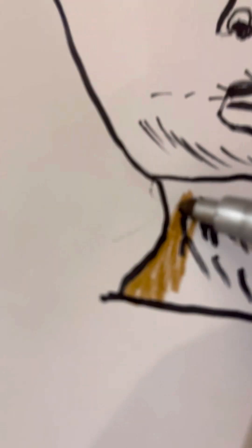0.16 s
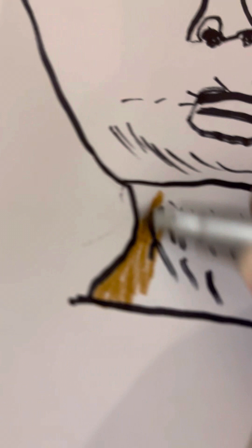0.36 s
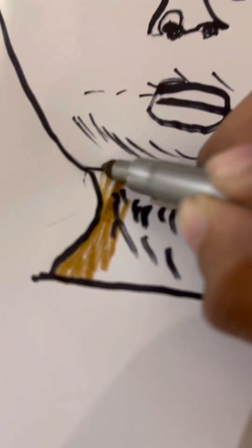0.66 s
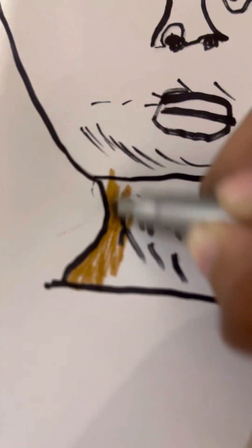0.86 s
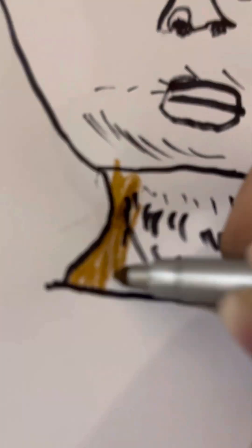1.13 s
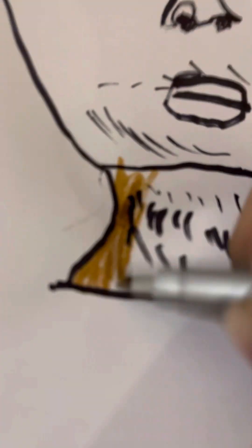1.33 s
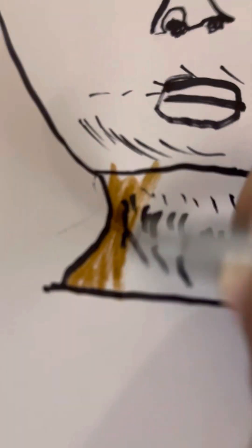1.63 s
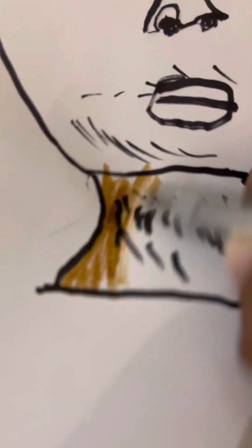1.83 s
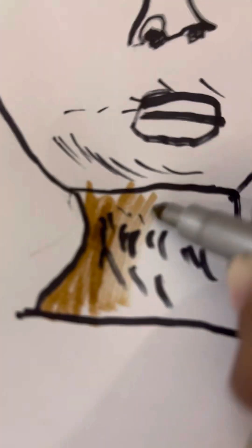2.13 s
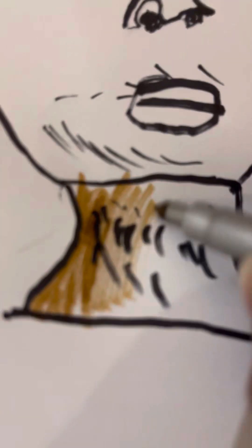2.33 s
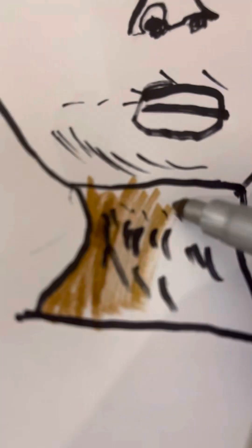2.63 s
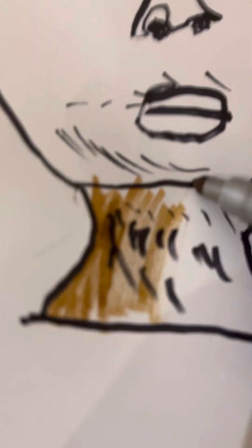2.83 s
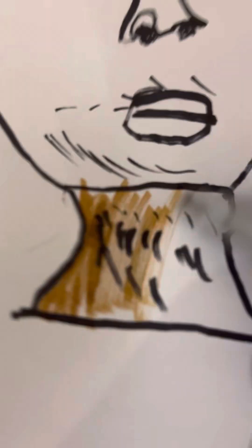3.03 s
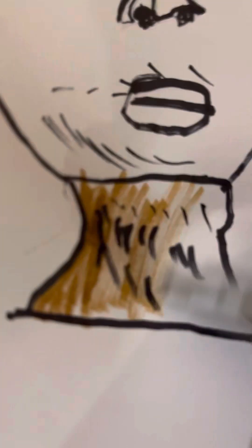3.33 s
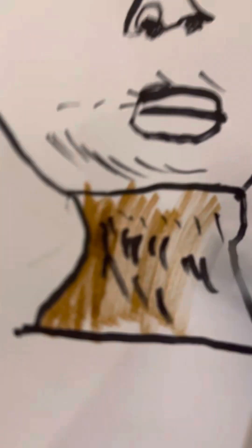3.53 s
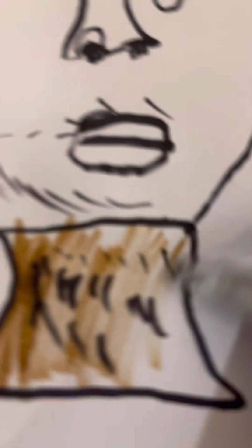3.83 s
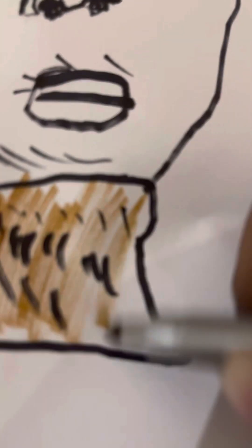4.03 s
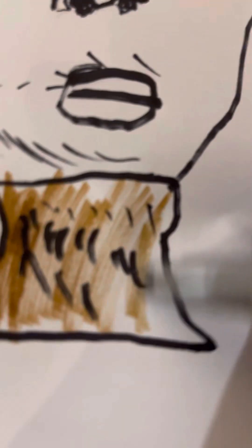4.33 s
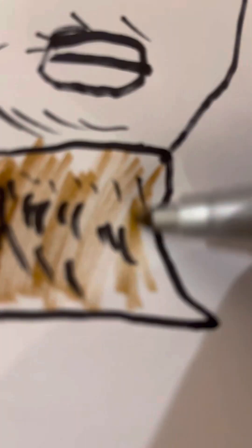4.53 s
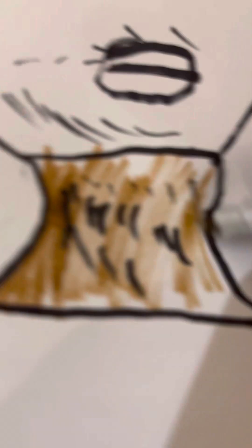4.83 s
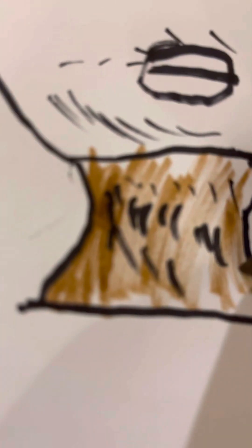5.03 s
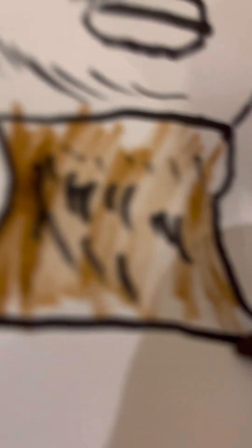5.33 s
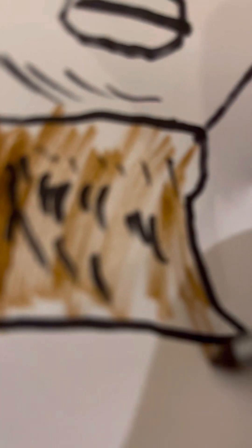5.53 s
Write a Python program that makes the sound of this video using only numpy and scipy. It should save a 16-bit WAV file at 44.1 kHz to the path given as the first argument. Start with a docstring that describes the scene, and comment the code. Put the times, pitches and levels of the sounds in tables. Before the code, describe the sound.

A felt marker scrubs rapidly to and fro on paper, faint at first, then hissing brightly, with small taps and a low room hum.

```python
"""Felt marker scrubbing on paper

A felt marker scrubs to and fro on paper, about ten strokes a second, heard close by and spread in stereo.
Its fibres hiss with the speed of the tip; the sheet rasps and rumbles as the tip drags. These are random snags,
filtered and shaped stroke by stroke. The landing tip ticks and the hand bumps the table: short dying tones.
An appliance hums in the room: a few steady tones over dull noise."""
import sys
import numpy as np
from scipy import signal
from scipy.fft import rfft, irfft, next_fast_len
from scipy.io import wavfile
from scipy.ndimage import uniform_filter1d, map_coordinates

SR = 44100
rng = np.random.default_rng(int(sys.argv[2]) if len(sys.argv) > 2 else 0)


def wrap_up_sound(samples):
    """Save the sound to the file named by the first command line argument, as 16-bit audio."""
    columns = np.atleast_2d(samples).T
    # keep every value between -1 and 1, then stretch to whole-number steps
    tamed = np.clip(columns, -1, 1)
    steps = np.round(tamed * 32767).astype(np.int16)
    wavfile.write(sys.argv[1], SR, steps)


N = 249606

# one to-and-fro of the tip, a push and then a pull: (moment of the turn [s], push length [s], pull length [s])
SCRUBS = [(0.158, 0.082, 0.085), (.346, 0.099, 0.078), (0.566, 0.067, 0.085), (0.737, 0.075, 0.076),
          (0.932, 0.1, .085), (1.118, .1, 0.082), (1.305, 0.09, 0.084), (1.5, 0.094, 0.088),
          (1.695, 0.09, .079), (1.877, 0.086, .075), (2.055, 0.081, .069), (2.232, 0.089, .069),
          (2.401, 0.086, 0.073), (2.577, 0.086, 0.07), (2.76, .078, .075), (2.955, .095, 0.081),
          (3.142, .091, .07), (3.323, 0.084, .074), (3.512, .089, .07), (3.686, .087, 0.071),
          (3.885, .09, 0.064), (4.072, 0.098, 0.074), (4.271, .093, .092), (4.483, .1, 0.076),
          (4.691, .095, 0.12), (4.921, 0.1, 0.069), (5.145, 0.084, .09), (5.36, 0.098, 0.024),
          (5.549, 0.063, 0.12)]
# how hard the tip bears on the sheet: (time [s], relative rasp level [dB])
PRESSURE = [(.12, -60), (.35, -50), (.75, -44.5), (1.35, -45), (2.15, -38.5), (2.4, -41.5), (2.75, -35.5),
            (3.6, -41.5), (3.88, -49.5), (4.3, -46), (4.7, -42), (5.33, -47), (5.6, -37)]
# tone colour of the loose sheet scuffing: (frequency [Hz], relative level per Hz [dB])
SCUFF = [(80, -3), (250, 0), (600, -1), (1100, -4.5), (2100, -8.5), (2900, -14), (10000, -45)]
RESTART_S = 0.006  # the tip sets off again this long after each turn


def marker(hiss_power=1.09, swish_power=0.54, rasp_power=0.57, rumble_power=0.56,
           rasp_bite=1.0, bite_s=0.0084, whisper_db=-15):
    """Each stroke bites, speeds up and slows to a turn; hiss follows speed, rasp and rumble last while it drags."""
    # tone colours: (frequency [Hz], relative level per Hz [dB])
    swish_colour = [(900, -24), (2000, -1), (2750, -16), (3700, -2.5), (4800, -13), (6200, 8), (8000, -11),
                    (14000, -25)]
    rasp_colour = [(200, -14.5), (500, -6.5), (950, -4), (1450, -4.5), (2100, -1), (2700, -7), (3500, -4.5),
                   (6000, -23.5), (14000, -36)]
    rumble_colour = [(25, -24), (45, 0.5), (70, 3), (130, 1.5), (200, -1.5), (330, -2), (500, -7),
                     (800, -21.5), (2000, -33.5), (5000, -90)]

    pace, hiss, rasp, rumble = np.zeros((4, N))  # loudness curves, except pace: speed from 0 to 1 in each stroke
    for start, end, fastest, hiss_db, rasp_db, rumble_db in strokes():
        t = np.arange(max(round((end - start) * SR), 2)) / SR
        # half a sine wave, bent so that its top falls on the fastest moment
        half_turns = np.interp(t / t[-1], [0, np.clip(fastest, 0, 1), 1], [0, 0.5, 1])
        speed = np.abs(np.sin(np.pi * half_turns))
        bite = np.exp(-t / bite_s)  # friction is highest as the tip breaks loose
        jolt = 0.2 * bite
        add(pace, start, speed)
        add(hiss, start, amp(hiss_db) * (speed ** hiss_power + jolt))
        add(rasp, start, amp(rasp_db) * (1 + rasp_bite * bite) * speed ** rasp_power)
        add(rumble, start, amp(rumble_db) * speed ** rumble_power)

    swish = amp(-29.5) * hiss ** swish_power  # a light touch keeps more of this duller part than of the bright one
    # the room carries each stroke on into the turn, and the table keeps trembling
    hiss = np.hypot(hiss, amp(-18.5) * linger(hiss, seconds=0.036))
    rasp = np.hypot(rasp, amp(-11) * linger(rasp, seconds=0.016))
    rumble = np.hypot(0.63 * rumble, 0.79 * linger(rumble, seconds=0.049))

    tooth_db = 0.6 * wobble(140)  # the paper's grain passing under the tip
    press_db = 1.3 * wobble(35)  # the pressure of the fingers wavers
    fibres = amp(-1.13) * thinned(fibre_hiss())
    bright = hiss * (fibres + amp(whisper_db) * nib_whisper(pace))
    dull_snags = coloured(catches(rate=9000, spread_db=1.5), swish_colour)
    dull = swish * patchy(dull_snags, depth_db=3.5)
    sheet_snags = coloured(catches(rate=7000, spread_db=2), rasp_colour)
    sheet = amp(press_db) * rasp * patchy(sheet_snags, depth_db=2.0)
    table_snags = coloured(catches(rate=1500, spread_db=2), rumble_colour)
    table = amp(2.0 + 1.86 * wobble(35)) * rumble * table_snags

    # brisk scrubbing makes the loose sheet patter on the table, right through the turns
    patter_level = amp(-18 + 3.3 * wobble(60)) * linger(hiss, seconds=0.096)
    patter = patter_level * coloured(catches(rate=900, spread_db=4.5), SCUFF)
    return amp(tooth_db) * (bright + dull + sheet) + table + patter


def strokes():
    """Each scrub pushes into a turn and pulls out: (start s, end s, fastest share, hiss dB, rasp dB, rumble dB)."""
    # how briskly the hand scrubs: (time [s], relative hiss level [dB])
    vigour = [(.12, -60), (.3, -46.5), (.6, -46.5), (.98, -45.5), (1.16, -34), (1.9, -28.5), (2.42, -30.5),
              (2.75, -25), (3.1, -27), (3.55, -27), (3.9, -31), (4.28, -38), (4.62, -35.5), (4.87, -35.5),
              (5.1, -42), (5.62, -44.5)]
    # the hand eases off on the way back along the patch's edge: (time [s], hiss of the pull against the push [dB])
    ease = [(4.52, 1.5), (4.75, -7.5), (5.2, -6), (5.39, -11), (5.6, 1.5)]
    push_peak, pull_peak = 0.57, 0.333  # fastest moment as a share of the stroke: pushes build up, pulls flick
    stop_s = 0.003  # the tip stops this long before each turn
    pull_rasp_db = -2  # a pull rasps less than a push

    for turn, push_s, pull_s in SCRUBS:
        push = turn - push_s, turn - stop_s, push_peak, False
        pull = turn + RESTART_S, turn + pull_s, pull_peak, True
        for start, end, fastest, pulled in push, pull:
            middle = (start + end) / 2
            vigour_db, pressure_db = at(vigour, middle), at(PRESSURE, middle)
            hiss_db = vigour_db + pulled * at(ease, middle)
            rasp_db = pressure_db + pulled * pull_rasp_db
            rumble_db = -7.5 + 0.44 * vigour_db + 0.4 * pressure_db  # the table follows both
            yield start, end, fastest, hiss_db, rasp_db, rumble_db


def fibre_hiss():
    """Dense snags of the felt, coloured by where on the sheet the tip is."""
    # (time [s], place of the tip [0 left, 1 middle, 2 or more right])
    place_curve = [(0, 0.15), (2.1, 0.038), (2.6, 0.84), (3.7, 1.1), (4.201, 1.2), (4.5, 2.7), (5.66, 0.92)]
    # tone colour at each place: (frequency [Hz], relative level per Hz [dB])
    left_colour = [(800, -31), (2600, -9), (3300, -5), (4300, -3.5), (5050, -0.5), (5800, -7), (7600, -2.5),
                   (8500, -5.5), (9400, -3.5), (10700, -8), (12000, -7), (13200, -10), (14500, -7),
                   (15700, -21)]
    middle_colour = [(800, -39), (2600, -13), (3300, -5.5), (4100, -8), (5200, 0.0), (6200, -5),
                     (7350, -0.4), (8400, -3), (9700, -3.5), (10900, -2), (11850, -12.5), (12700, -5),
                     (14200, -9.5), (15700, -7.5)]
    right_colour = [(800, -35), (2600, -5.5), (3400, -1.8), (4500, -6.7), (5200, -0.0), (6000, -0.5),
                    (7400, -8.9), (9000, -7.2), (10000, -4.5), (10800, 0.0), (11900, -4.5), (12700, -4.1),
                    (13500, -12.8), (15700, -17.4)]

    place = np.clip(at(place_curve, np.arange(N) / SR), 0, 2)
    hiss = np.zeros(N)
    for k, colour in enumerate([left_colour, middle_colour, right_colour]):
        share = np.sqrt(np.clip(1 - np.abs(place - k), 0, 1))  # fades between neighbouring places
        hiss += share * coloured(catches(rate=16000, spread_db=1), colour)
    return patchy(hiss, depth_db=3.0)


def thinned(hiss, thin_db=-7, thin_hz=4750):
    """On a pull the fibres trail behind the tip, and the hiss below thin_hz drops by thin_db."""
    t = np.arange(N) / SR
    pulling = np.any([(t > turn) & (t < turn + pull_s) for turn, _, pull_s in SCRUBS], axis=0)
    body = filtered(hiss, lambda hz: 1 / (1 + (hz / thin_hz) ** 16))  # the part below thin_hz
    return hiss + (amp(thin_db) - 1) * pulling * body


def nib_whisper(speed, rest_hz=4650, rise_hz=520, width_hz=260):
    """The nib's own narrow resonance, which rises in pitch as the tip speeds up."""
    # slow noise carried up to the moving pitch
    band = filtered(rng.standard_normal((2, N)), lambda hz: 1 / (1 + (hz / width_hz) ** 4))
    phase = 2 * np.pi * np.cumsum(rest_hz + rise_hz * speed) / SR
    return unit(band[0] * np.cos(phase) + band[1] * np.sin(phase))


def catches(rate, spread_db):
    """Fibres snagging on the paper's tooth: random impulses of uneven size, rate a second."""
    snagged = rng.random(N) < rate / SR
    sizes = rng.standard_normal(N) * amp(spread_db * rng.standard_normal(N))
    return unit(snagged * sizes)


def patchy(x, depth_db):
    """The tip rolls in the fingers, so patches of the spectrum swell and fade from stroke to stroke."""
    z = signal.stft(x, nperseg=512)[2]
    field = uniform_filter1d(rng.standard_normal(z.shape), size=6, axis=0)  # smooth over pitch
    field = uniform_filter1d(field, size=12, axis=1)  # smooth over time
    return unit(signal.istft(z * amp(depth_db * unit(field)), nperseg=512)[1][:N])


def linger(level, seconds):
    """A level that builds up and dies away with the given time constant."""
    keep = np.exp(-1 / (seconds * SR))
    return signal.lfilter([1 - keep], [1, -keep], level)


def ticks(thud_hz=260, thud_t60=0.047, scuff_db=-10, scuff_t60=0.086):
    """A landing tip rings the sheet briefly, thuds into the table and scuffs before it slides."""
    # the sheet on its table, when struck:
    # (typical frequency [Hz], typical relative level [dB], time to fade by 60 dB [s])
    sheet_modes = [(630, -2, 0.021), (976, 1.5, 0.026), (1220, 1.5, 0.017), (1580, -4.5, 0.02),
                   (2210, -6.5, .025), (3350, -18, .012)]
    out, scuff = np.zeros((2, N))
    t = np.arange(SR // 10) / SR
    give = 1 - np.exp(-t / 0.0005)  # the felt yields before it pushes
    for s, db, thud_db in landings():
        ring = 0
        for hz, level, t60 in sheet_modes:
            hz = hz * (1 + 0.094 * rng.standard_normal())  # every spot of the sheet rings differently
            fade = amp(level + 2 * rng.standard_normal() - 60 * t / t60)
            ring = ring + fade * np.sin(2 * np.pi * (hz * t + rng.random()))
        thud = amp(thud_db - 60 * t / thud_t60) * np.sin(2 * np.pi * thud_hz * t)
        add(out, s, amp(db - 8.5) * give * ring + amp(db - 4.0) * thud)
        add(scuff, s, amp(db + scuff_db - 60 * t / scuff_t60) * give)
    return out + scuff * coloured(catches(rate=2400, spread_db=2), SCUFF)


def landings():
    """The hard landings, then a light catch after every turn: (s, relative tick dB, relative thud dB)."""
    # the tip lands hard: (time [s], relative tick level [dB], thud added to the tick, before mixing [dB])
    hard_landings = [(1.316, -28, -6), (1.507, -29, -3), (2.504, -27.5, -9), (2.769, -26.5, 4),
                     (2.934, -20, -18.5), (2.986, -24.5, -4), (3.216, -26, -12), (3.399, -27.5, -1),
                     (3.719, -23, -13), (3.863, -25, 10.5), (3.913, -25.5, -4), (4.267, -19, -16),
                     (4.274, -23, -4), (4.822, -24, -13), (5.377, -30, 5), (5.4, -29, 4), (5.425, -30, 6.5)]
    catch_db, spread_db, catch_thud_db = -35.5, 1.5, -1
    over_rasp_db = 8  # under a light touch the typical tick stays within this much of the rasp setting
    yield from hard_landings
    for turn, _, _ in SCRUBS:
        db = min(catch_db, at(PRESSURE, turn) + over_rasp_db)
        yield turn + RESTART_S, db + spread_db * rng.standard_normal(), catch_thud_db


def bumps(t60=0.058, attack=0.0034, drop=0.74, settle=0.0028):
    """The soft side of the hand sets the table swinging for a few cycles, quicker at first."""
    # the hand bumps the table: (time [s], relative level [dB], pitch it settles to [Hz])
    hand_bumps = [(1.323, -30, 262), (2.199, -20.5, 104), (2.577, -25.5, 282), (2.776, -22.5, 326.5),
                  (2.933, -28, 340), (3.863, -27, 241), (3.912, -23.5, 102), (4.037, -25, 154),
                  (4.082, -23, 144.2), (4.241, -21.5, 182), (5.354, -24.5, 120), (5.39, -21.5, 104.6),
                  (5.454, -23, 103)]
    out, t = np.zeros(N), np.arange(SR // 6) / SR
    for s, db, hz in hand_bumps:
        # the pitch starts higher by the share drop, and settles
        cycles = hz * (t + drop * settle * (1 - np.exp(-t / settle)))
        swell = 1 - np.exp(-t / attack)
        add(out, s, amp(db + 4.0 - 60 * t / t60) * swell * np.sin(2 * np.pi * cycles))
    return out


def room():
    """A motor hums, slightly unsteady, over the dull air of the room."""
    # tones of the motor: (frequency [Hz], typical rms level [dB])
    hum_tones = [(88.2, -41), (133.5, -52.5), (176.4, -63), (221, -61), (309, -59)]
    # tone colour of the air: (frequency [Hz], relative level per Hz [dB])
    air_colour = [(20, -32), (50, 3.5), (100, 3), (170, -9.5), (350, -6.5), (600, -14.5), (1500, -24.5),
                  (4000, -29.5), (9000, -32), (15800, -36)]
    t = np.arange(N) / SR + 0.00022 * wobble(3.23)  # uneven time makes the pitch waver
    hum = np.zeros(N)
    for hz, db in hum_tones:
        level = np.sqrt(2) * amp(db + 0.5 * wobble(4.9))  # root 2 turns rms into peak
        hum += level * np.sin(2 * np.pi * (hz * t + rng.random()))
    return hum + amp(-47) * coloured(rng.standard_normal(N), air_colour)


def stereo_spread(x, diffuse_db=-5, diffuse_hz=500):
    """The sound, with a shifting diffuse part in the treble, spreads left and right with unlike phase and level."""
    # (frequency [Hz], phase by which the left leads [radians])
    phase_lead = [(0, 0), (150, -.4), (550, -1.2), (950, -.4), (1700, 0), (2700, 2.1), (3700, 1.5),
                  (5000, 1.2), (5400, 1.7), (5750, 3), (6250, 3.25), (6750, 4.65), (8100, 6.28), (9350, 8),
                  (9950, 9.2), (10600, 9.6), (11800, 12.1), (13100, 12.8), (14300, 15.5), (15700, 16.3)]
    # (frequency [Hz], left minus right level [dB])
    balance = [(80, -.8), (300, -3.8), (750, -6.5), (1200, -2), (1800, 0), (2700, -4.5), (3800, -2),
               (4900, -3.5), (5750, 0)]

    treble = filtered(x, lambda hz: (hz / (hz + diffuse_hz)) ** 2)
    drift = np.exp(1j * np.pi * np.array([wobble(25), wobble(25)]))  # two wandering phases
    t = np.arange(SR // 50) / SR
    tails = rng.standard_normal((2, len(t))) * amp(-60 * t / 0.015)  # short dying noise smears the treble
    tails = tails / np.linalg.norm(tails, axis=1, keepdims=True)
    drifting = np.real(signal.hilbert(treble, next_fast_len(N))[:N] * drift)
    diffuse = signal.fftconvolve(drifting, tails, axes=1)[:, :N]

    def half(hz):
        """Half the lead: the left goes forward by it and the right back."""
        return np.interp(hz, *np.transpose(phase_lead)) / 2

    both = x + amp(diffuse_db) * diffuse
    mid, side = filtered(both, lambda hz: np.array([np.cos(half(hz)), 1j * np.sin(half(hz))]))
    pair = np.array([mid + side, mid - side])
    return filtered(pair, lambda hz: amp(np.outer([0.5, -0.5], along(balance, hz))))


def amp(db):
    """Decibels to gain."""
    return 10 ** (np.asarray(db) / 20)


def unit(x):
    """Scale to rms 1."""
    return x / np.sqrt(np.mean(x ** 2) + 1e-20)


def at(curve, s):
    """The value of an (s, value) curve at time s."""
    return np.interp(s, *np.transpose(curve))


def along(points, hz):
    """(Hz, value) points read on a log axis."""
    f, v = np.transpose(points)
    return np.interp(np.log(hz + 1), np.log(f + 1), v)


def wobble(rate):
    """A smooth random curve, rate knots a second."""
    knots = rng.standard_normal(int(N * rate / SR) + 4)
    return map_coordinates(knots, [np.arange(N) * rate / SR])


def filtered(x, response):
    """x times a complex response of frequency."""
    m = next_fast_len(N + SR // 4)
    return irfft(rfft(x, m) * response(np.fft.rfftfreq(m, 1 / SR)), m)[..., :N]


def coloured(x, spectrum):
    """x shaped by the given spectrum, at rms 1."""
    return unit(filtered(x, lambda hz: amp(along(spectrum, hz))))


def add(track, s, sound):
    """Mix a sound into the track at time s."""
    i = max(round(s * SR), 0)
    track[i:i + len(sound)] += sound[:max(N - i, 0)]


def scene():
    """Marker, hand and room, spread between left and right."""
    return stereo_spread(marker() + ticks() + bumps() + room())


def record(dry):
    """Nothing is kept above the band limit."""
    return filtered(dry, lambda hz: hz < 15850)


dry = scene()
out = record(dry)
wrap_up_sound(out)
```